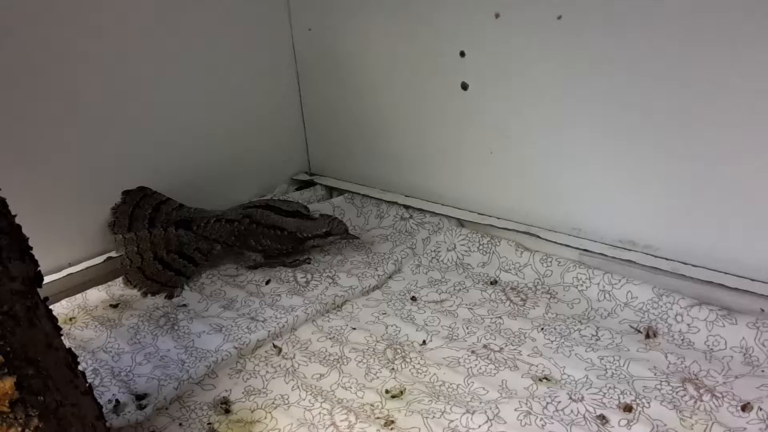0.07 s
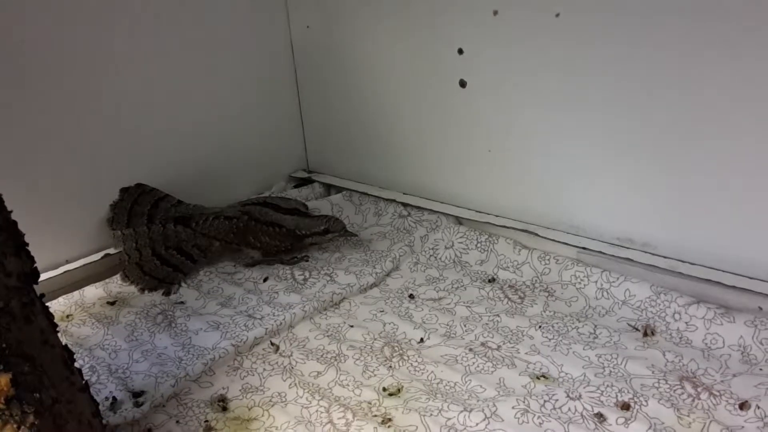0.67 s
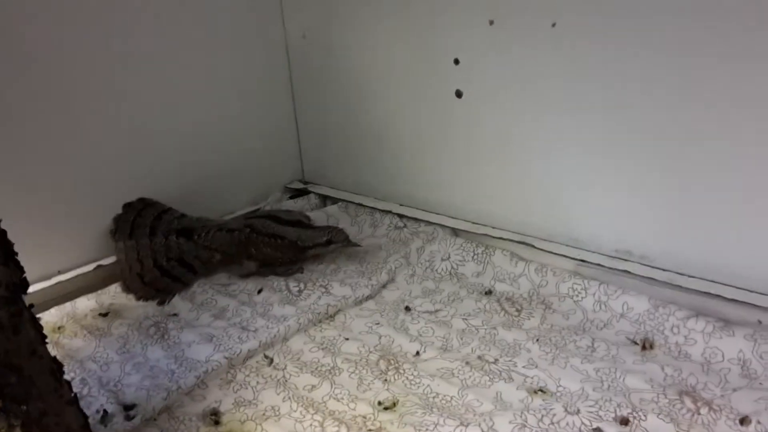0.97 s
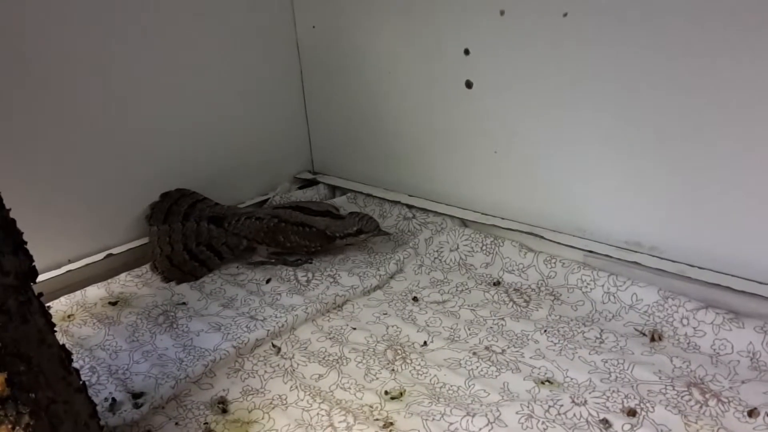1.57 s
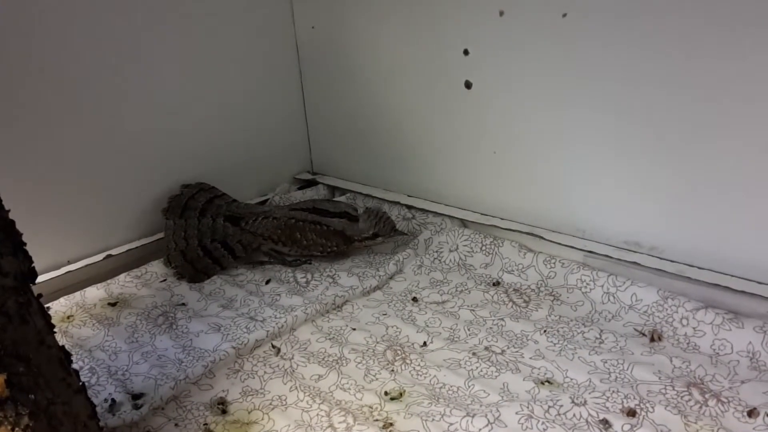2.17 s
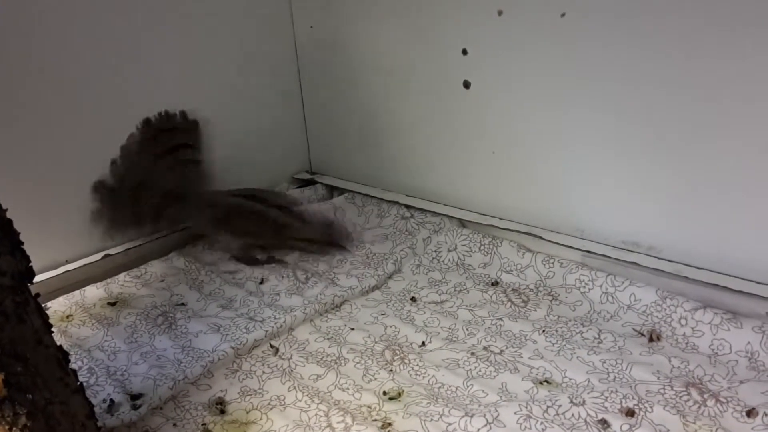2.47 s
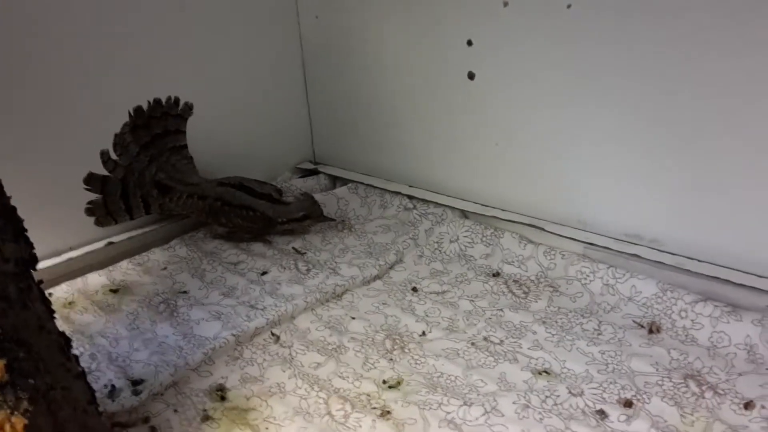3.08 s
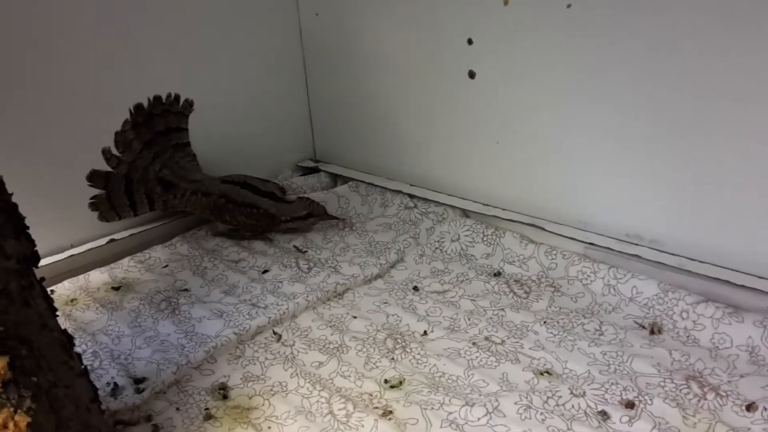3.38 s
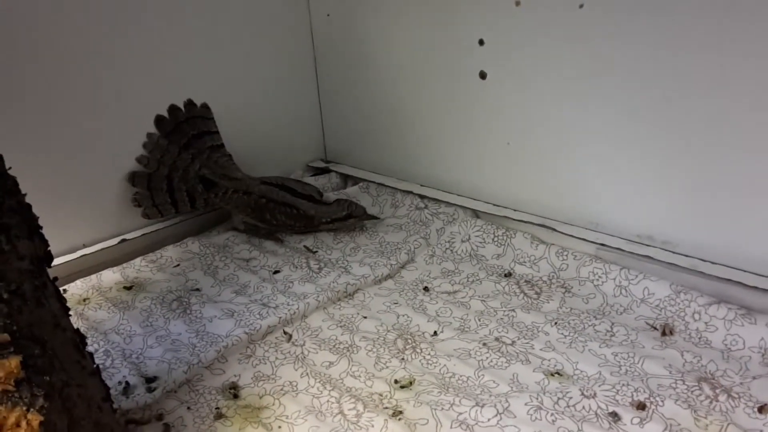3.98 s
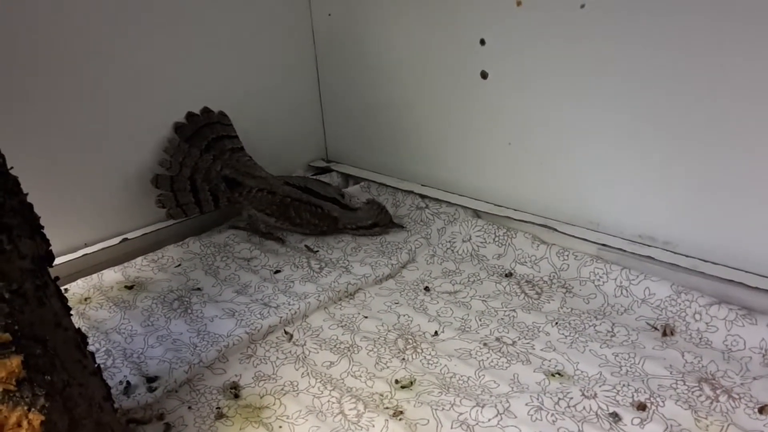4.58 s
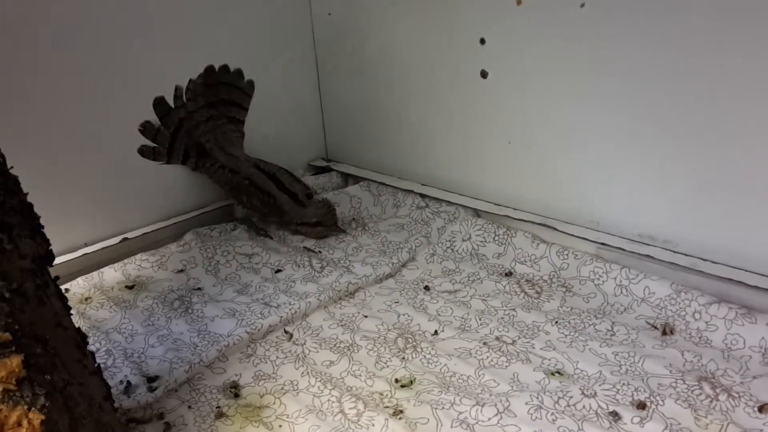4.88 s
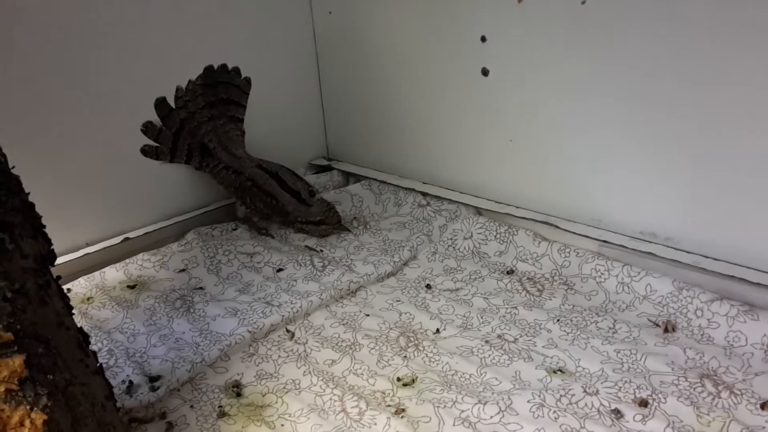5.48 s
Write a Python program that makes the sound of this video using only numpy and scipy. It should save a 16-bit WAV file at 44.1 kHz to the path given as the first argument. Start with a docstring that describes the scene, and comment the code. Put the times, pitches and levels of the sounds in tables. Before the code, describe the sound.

Soft paper scuffs, feather hiss and hollow knocks from a bird in a box, with handling thumps, faint chirps and ventilation hum.

```python
"""Over a low ventilation rumble, a small bird shuffles on the paper lining of a box: by friction its
feathers hiss and the paper scuffs. Near 1 s other birds call faintly, and fingers give the nearby
hand-held camera the hardest of many bumps. Just before 2 s a first knock rings the box's hollow modes.
From 2.3 s a bird in the room peeps; the one in the box lunges at about 2.5 s, a claw clicking.
It lunges again just before 5 s, and the last and loudest knock follows."""
import sys
import numpy as np
from scipy import signal
from scipy.fft import rfft, irfft, next_fast_len
from scipy.io import wavfile
from scipy.ndimage import map_coordinates

SR = 44100
rng = np.random.default_rng(int(sys.argv[2]) if len(sys.argv) > 2 else 0)


def pcm_store(signal):
    """Save signal as 16-bit PCM."""
    levels = np.round(np.clip(np.atleast_2d(signal), -1, 1) * 32767)
    wavfile.write(sys.argv[1], SR, levels.astype(np.int16).T)


N = 243873
TIME = np.arange(N) / SR

# feather strokes over paper and wall: t/s of the fastest moment, relative level/dB, rise/s
FEATHER_STROKES = [(0.33, -64, 0.054), (1.05, -76, .04), (1.19, -71.5, .08), (1.304, -61.5, .022),
                   (1.63, -73, .04), (1.79, -71.5, 0.021), (2.072, -62.5, .016), (2.16, -74, .04),
                   (2.22, -64, .022), (2.52, -61, 0.028), (2.561, -56, 0.013), (2.597, -58, .014),
                   (2.68, -61.5, 0.049), (3.035, -67, 0.042), (3.305, -72.5, 0.039), (4.85, -68, 0.041),
                   (4.932, -57.5, 0.039)]
# spectra of brushing barbs and of their bright top in fast sweeps: f/Hz, relative level/dB
BARB_SPECTRUM = [(1500, -12), (3500, -7), (4700, -5), (5700, -34), (7500, -2.5), (8800, -12), (9900, 0),
                 (11200, -8), (14500, -3.5)]
SHEEN_SPECTRUM = [(6000, -48), (7500, -20), (9500, -8), (11500, -3), (14500, 3)]
# feet and body dragging the paper: t/s, length/s, level/dB, crackle re that level/dB
PAPER_DRAGS = [(0.043, 0.58, -61, -12.5), (1.043, 0.25, -50.5, -21.5), (1.28, 0.077, -56, -9.5),
               (1.328, 0.52, -64, -14), (2.116, 0.16, -53, -26), (2.503, 0.05, -58, -10),
               (2.544, 0.15, -45.5, -19), (2.668, 0.069, -48.5, -15.5), (2.727, 0.11, -57.5, -19.5),
               (2.97, 0.17, -60, -15), (3.279, 0.056, -45, -34), (3.498, 0.62, -59, -28),
               (4.063, 0.43, -58, -18), (4.809, 0.24, -54, -19.5), (4.92, 0.038, -52, -11)]
# spectra of the floor's murmur and the sheet's crackle: f/Hz, relative level/dB
MURMUR_SPECTRUM = [(50, -31), (130, 6.5), (320, 1.5), (400, 1.5), (640, -6.5), (950, -20.5), (1500, -29.5),
                   (3000, -29), (6000, -68)]
CRACKLE_SPECTRUM = [(500, -35), (900, 0), (1130, -18), (1270, -7), (1380, -4.5), (1550, -10), (2070, 6),
                    (2280, -3.5), (2480, 1.5), (3100, -36), (3700, -11.5), (4500, -28), (5600, -32),
                    (12000, -28)]
# blows on the box, except the faint one at 2.68 s, a scrape that rings the box alike: t/s, level/dB
BOX_KNOCKS = [(1.8835, -41.5), (2.677, -51.5), (4.01, -37), (4.269, -52.5), (5.0, -32.5)]
# modes of the box's panels and air: f/Hz, relative level/dB, T60/s
BOX_MODES = [(104.4, -3.5, 0.22), (170, -11, 0.4), (207.6, -1, 0.28), (237.5, -4, 0.2), (269.8, -1.5, 0.24),
             (318.4, -5.5, 0.33), (342, -28, 0.33), (460, 0, 0.13), (475.4, -9.5, 0.32), (564, -11, 0.09),
             (550.2, -1, 0.18), (676, -4, 0.061), (694, -39.5, 0.07), (874, -15.5, 0.14),
             (1164, -30.5, 0.081), (1917, -24.5, 0.079)]
# spectra of a knock's clatter and a claw's snap: f/Hz, relative level/dB
CLATTER_SPECTRUM = [(80, -38), (250, 0.5), (600, 9), (760, -6.5), (1050, -15), (1550, -21), (2000, -20.5),
                    (3200, -39), (6000, -62)]
CLAW_SPECTRUM = [(300, 3), (1000, 1), (4500, 9.0), (6000, -40), (10000, -14), (14000, -9)]
# claws clicking on the sheet: t/s, level/dB
CLAW_CLICKS = [(2.5587, -55), (3.307, -56.5)]
# fingers bumping the camera body: t/s, left level/dB, nominal f/Hz
FINGER_BUMPS = [(0.347, -37.5, 192), (0.483, -38.5, 188), (0.566, -39, 176), (1.0356, -16, 374),
                (1.0583, -22.5, 385), (1.308, -34, 174), (1.373, -37, 196), (1.821, -41, 216),
                (2.0948, -27, 189), (2.9328, -27, 190), (3.2831, -28.5, 240), (3.2895, -34, 234),
                (3.3076, -29.5, 332), (3.688, -37, 166), (3.794, -31, 208), (5.246, -29.5, 164),
                (5.257, -30.5, 146), (5.374, -32.5, 208)]
# one bird's run of peeps: t/s, start f/Hz, relative level/dB, rasp depth
PEEP_RUN = [(2.294, 3790, -62, 0.55), (2.486, 4000, -55, .3), (2.708, 3900, -63, 1),
            (2.912, 3980, -68.5, .4), (3.12, 4020, -60.5, .25), (3.289, 4260, -60, .25),
            (3.322, 3965, -59.5, 1.2), (3.533, 3925, -62, .4), (3.698, 4150, -64.5, 2.4),
            (3.728, 4020, -61, .45), (4.228, 3950, -72, 1.3), (4.471, 3980, -76.5, 0.92),
            (4.963, 3950, -70, 1.2), (5.131, 4200, -71.5, .9), (5.349, 4130, -73.5, .35)]
# other birds: t/s, length/s, start f/Hz, end f/Hz, relative level/dB, right minus left/dB, rasp depth
HIGH_CHIRPS = [(0.975, 0.03, 8100, 6480, -55.5, -3, 0.42), (0.998, 0.058, 8000, 7300, -63.5, -11, 1.2),
               (1.157, .06, 5100, 3540, -71, 11, 1.6), (1.172, 0.031, 6650, 6850, -66, 11, 0.98)]
# the room's reverberation time: f/Hz, T60/s
ROOM_DECAY = [(3500, .27), (8000, .17)]
# spectrum of the ventilation: f/Hz, relative level/dB
VENT_SPECTRUM = [(18, -17), (45, -2), (80, 5), (150, -5), (300, -7), (390, -11), (560, -12.5), (750, -26),
                 (1100, -35), (1600, -38.5), (2300, -27), (2650, -31), (3200, -49.5), (9000, -86)]
# room and box tones in the rumble: f/Hz, level/dB
HUM_TONES = [(99, -62), (208, -68), (316, -71)]
# level difference between the microphone ports: f/Hz, left minus right/dB
PORT_BALANCE = [(100, 6), (500, 3), (1200, 1), (4000, 0.5)]
# likeness of the sound at the two ports: f/Hz, coherence
PORT_COHERENCE = [(40, .1), (90, 0.31), (250, 0.43), (500, 0.46), (1200, 0.127), (3000, 0.026)]
# spectrum of the electronics' hiss: f/Hz, relative level/dB
HISS_SPECTRUM = [(500, -7.5), (4400, 6), (5600, -2.5), (8500, -2), (10500, 6), (14500, 5.5)]


def feathers():
    """Friction noise: barbs catch on the paper in a fine hiss that brightens with speed."""
    level_db = stroke_level() + 1.7 * wobble(35)
    barbs = friction(BARB_SPECTRUM, rate=3000, spread_db=2.5, smooth=1.2)
    sheen = friction(SHEEN_SPECTRUM, rate=2200, spread_db=1.0, smooth=1)
    speed = np.clip((level_db + 69) / 11, 0, 1)
    return amp(level_db - 8.5) * barbs + amp(level_db - 13.0) * speed * sheen


def stroke_level():
    """Incoherent addition: strokes and slight fidgeting sum in power, returned as a level in dB."""
    stop_s, settle_s, settle_db = 0.022, 0.18, -11.5
    power = amp(-80 + 3.1 * wobble(3.97)) ** 2  # fidgeting
    for s, db, rise_s in FEATHER_STROKES:
        before, after = np.maximum(s - TIME, 0), np.maximum(TIME - s, 0)
        swell = np.exp(-(before / rise_s) ** 2)
        # the stroke stops quickly, then the plumage settles
        release = np.hypot(np.exp(-after / stop_s), amp(settle_db) * np.exp(-after / settle_s))
        power += (amp(db) * swell * release) ** 2
    return 10 * np.log10(power)


def paper_scuffs():
    """Stick-slip: each drag swells fast and fades in jerks; the sheet crackles, the floor murmurs."""
    drag, crackle_gain = np.zeros(N), np.zeros(N)
    for s, length, db, crackle_db in PAPER_DRAGS:
        progress = np.clip((TIME - s) / length, 0, 1)
        stroke = amp(db) * np.abs(np.sin(np.pi * progress ** .5))
        drag += stroke
        crackle_gain += stroke * amp(crackle_db)
    grip = amp(2.5 * wobble(70) - .7)
    murmur = friction(MURMUR_SPECTRUM, rate=700, spread_db=3.0, smooth=0.99)
    crackle = friction(CRACKLE_SPECTRUM, rate=1100, spread_db=4.0, smooth=0.75)
    return grip * (drag * murmur + crackle_gain * crackle)


def friction(spectrum, rate, spread_db, smooth):
    """Shot noise: tiny slips of uneven size, rate a second, on a smooth hiss."""
    slipping = rng.random(N) < rate / SR
    sizes = amp(spread_db * np.minimum(rng.exponential(size=N), 4))
    slips = unit(slipping * sizes * rng.standard_normal((2, N)))
    return coloured(slips + smooth * rng.standard_normal((2, N)), spectrum)


def box_knocks():
    """Modal ringing: a blow opens with a clack and starts the box's damped modes nearly in step."""
    out, t = np.zeros((2, N)), TIME[:SR // 2]
    crest_s, clack_hz, clatter_t60 = 0.00556, 610, 0.27
    phases = rng.uniform(-1.3, 1.3, len(BOX_MODES))
    ring = sum(amp(db - 60 * t / t60) * np.cos(2 * np.pi * hz * (t - crest_s) + phase)
               for (hz, db, t60), phase in zip(BOX_MODES, phases))
    grit = coloured(rng.standard_normal((2, N)), CLATTER_SPECTRUM)[:, :len(t)]
    clatter = grit * amp(-5.5 - 60 * t / clatter_t60)
    clack = np.exp(-((t - .0035) / .0035) ** 2) * np.cos(2 * np.pi * clack_hz * (t - crest_s))
    blow = (clatter - clack) * (1 - np.exp(-t / 0.0011)) - ring * (1 - np.exp(-t / 0.0082))
    for s, db in BOX_KNOCKS:
        add(out, s, amp(db) * blow)
    return out


def claws():
    """Sudden release: a claw snaps off the sheet in a broadband pulse of a few milliseconds."""
    snaps = sum(amp(db) * np.exp(-((TIME - s) / .0014) ** 2) for s, db in CLAW_CLICKS)
    return snaps * coloured(rng.standard_normal((2, N)), CLAW_SPECTRUM)


def finger_bumps():
    """Structure-borne sound: the case carries bumps to the left port, weaker and slower to the right."""
    out, t = np.zeros((2, N)), TIME[:SR // 10]
    contact = np.exp(-((t - .0018) / .0008) ** 2)
    for s, db, hz in FINGER_BUMPS:
        right_db = -19.5 + 12.5 * np.log2(hz / 200)  # higher bumps cross better
        grit = filtered(rng.standard_normal((2, len(t))), lambda f: 1 / (1 + (f / 2300) ** 2.5))
        tick = grit * contact * amp(-3.5 + 0.69 * db)  # harder contact is brighter
        swing = np.array([thud(hz, t), thud(hz * 0.69, t)])
        add(out, s, amp(db) * amp([[0], [right_db]]) * (tick - swing))
    return out


def thud(hz, t):
    """Impulse response of a heavily damped case, scaled to peak 1."""
    band = signal.butter(3, [hz * 0.48, hz * 1.303], "bandpass", fs=SR, output="sos")
    swing = signal.sosfilt(band, 1. * (t == 0))
    return swing / np.abs(swing).max()


def other_birds():
    """Direct plus reverberant sound: falling peeps and higher calls are blurred by the room."""
    calls = np.zeros((2, N))
    for s, hz, db, rasp in PEEP_RUN:
        add(calls, s, chirp(length=.044, start_hz=hz, end_hz=hz - 800, db=db, right_db=6, rasp=rasp))
    for s, *call in HIGH_CHIRPS:
        add(calls, s, chirp(*call))
    return amp(-7.5) * calls + amp(-8) * room(calls)


def chirp(length, start_hz, end_hz, db, right_db, rasp):
    """Modulation: a thin tone holds, then glides as random sidebands turn it raspy."""
    progress = np.clip(TIME[:SR // 8] / length, 0, 1)
    phase = 2 * np.pi * np.cumsum(start_hz + (end_hz - start_hz) * progress ** 2) / SR
    flutter = unit(filtered(rng.standard_normal((2, len(phase))), lambda hz: 1 / (1 + (hz / 420) ** 3)))
    depth = rasp * (.25 + 1.3 * progress)
    voice = (1 + depth * flutter[0]) * np.sin(phase) + depth * flutter[1] * np.cos(phase)
    voice /= np.sqrt(1 + 2 * depth ** 2)  # the rasp adds no power
    voice += amp(-22.5) * np.sin(2 * phase)  # a weak octave overtone
    swell = np.abs(np.sin(np.pi * progress ** .8))
    return amp(db + np.array([[-right_db], [right_db]]) / 2) * swell * voice


def room(x):
    """Diffuse reverberation: an exponential tail, different at each port, shorter in the treble."""
    hz, t, noise = signal.stft(rng.standard_normal((2, SR // 2)), SR, nperseg=256)
    decay = amp(-60 * t / along(ROOM_DECAY, hz)[:, None])
    build_up = 1 - np.exp(-t / 0.014)
    tail = signal.istft(noise * decay * build_up, SR, nperseg=256)[1]
    return signal.fftconvolve(x, tail / np.linalg.norm(tail[0]), axes=1)[:, :N]


def ventilation():
    """Resonance in noise: a low rumble carries a few wavering tones of the room and box."""
    rumble = amp(-55.0 + 0.9 * wobble(5.5)) * coloured(rng.standard_normal((2, N)), VENT_SPECTRUM)
    for hz, db in HUM_TONES:
        phase = 2 * np.pi * hz * TIME
        rumble += amp(db) * unit(wobble(12) * np.sin(phase) + wobble(11) * np.cos(phase))
    return rumble


def coloured(pair, spectrum):
    """Partial coherence: two unrelated signals become a stereo field of rms 1, more alike in the bass."""
    def response(hz):
        angle = np.arccos(along(PORT_COHERENCE, hz)) / 2
        return amp(along(spectrum, hz)) * [np.cos(angle), np.sin(angle)]
    mid, side = filtered(pair, response)
    return unit(np.array([mid + side, mid - side]))


def amp(db):
    """Amplitude ratio of a level in dB."""
    return 10 ** (np.asarray(db) / 20)


def unit(x):
    """Normalisation to rms 1."""
    return x / np.sqrt(np.mean(x ** 2) + 1e-20)


def along(points, hz):
    """Interpolation of (f/Hz, value) points on a log frequency axis."""
    f, values = np.transpose(points)
    return np.interp(np.log(hz + 1), np.log(f + 1), values)


def filtered(x, response):
    """Linear filtering: the spectrum of x times a frequency response."""
    size = next_fast_len(x.shape[-1] + SR // 2)
    hz = np.fft.rfftfreq(size, 1 / SR)
    return irfft(rfft(x, size) * response(hz), size)[..., :x.shape[-1]]


def wobble(rate):
    """Slow fluctuation: a smooth random curve, rate knots a second."""
    return map_coordinates(rng.standard_normal(int(N * rate / SR) + 4), [TIME * rate])


def add(track, s, sound):
    """Superposition of a sound on the track at time s."""
    part = track[:, max(round(s * SR), 0):][:, :sound.shape[-1]]
    part += sound[..., :part.shape[-1]]


def scene():
    """Superposition at two ports: low sounds in the box reach the left one more strongly."""
    airborne = ventilation() + box_knocks() + paper_scuffs() + feathers() + claws()
    at_ports = filtered(airborne, lambda hz: amp(along(PORT_BALANCE, hz) * np.array([[.5], [-.5]])))
    return at_ports + other_birds() + finger_bumps()


def record(dry):
    """Resonance makes the right port whistle; the electronics add hiss and limit the band."""
    port_hz, width_hz, port_db = 10050, 480, 23
    start_s, top_hz = .066, 14600
    port = lambda f: 1 + amp(port_db) * 1j * f * width_hz / (port_hz ** 2 - f ** 2 + 1j * f * width_hz)
    hiss = amp(-78.5) * coloured(rng.standard_normal((2, N)), HISS_SPECTRUM)
    heard = np.array([dry[0], filtered(dry[1], port)]) + hiss
    fade_in = np.clip((TIME - start_s) * 100, 0, 1)
    return filtered(heard * fade_in, lambda hz: hz < top_hz)


dry = scene()
out = record(dry)
pcm_store(out)
```